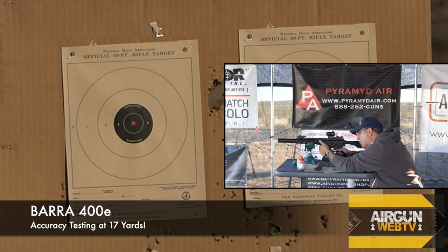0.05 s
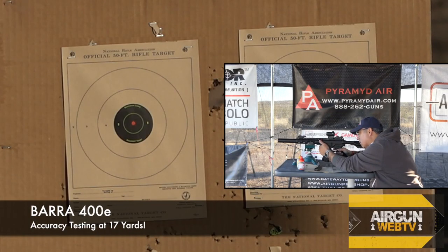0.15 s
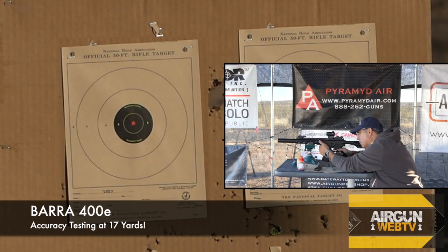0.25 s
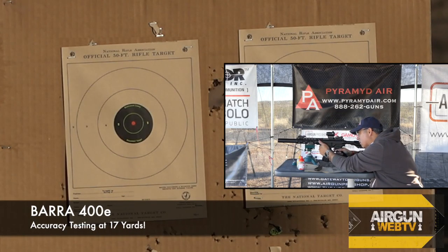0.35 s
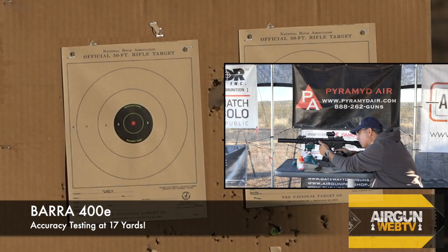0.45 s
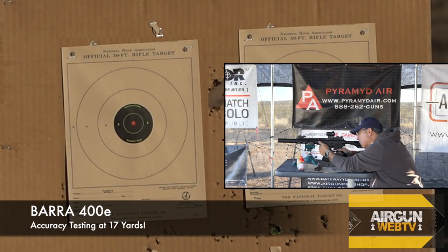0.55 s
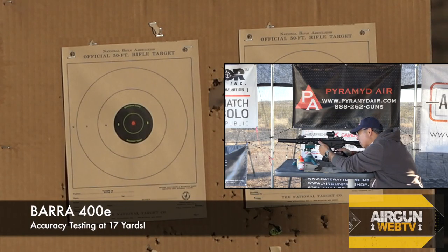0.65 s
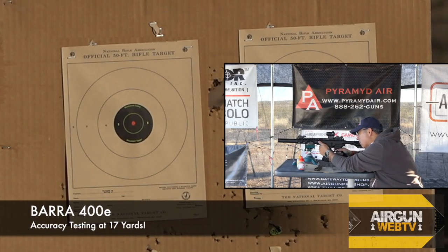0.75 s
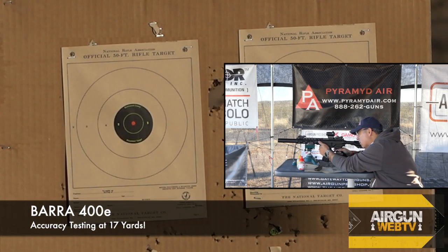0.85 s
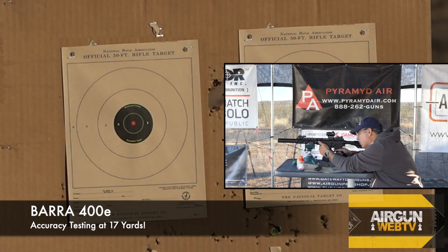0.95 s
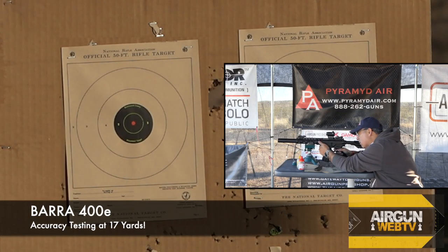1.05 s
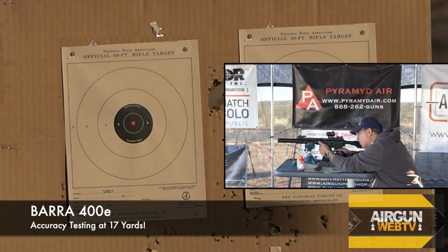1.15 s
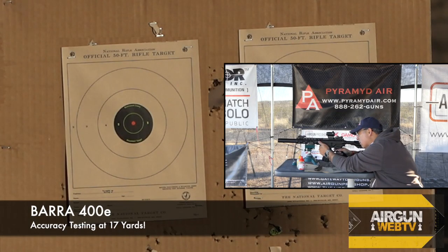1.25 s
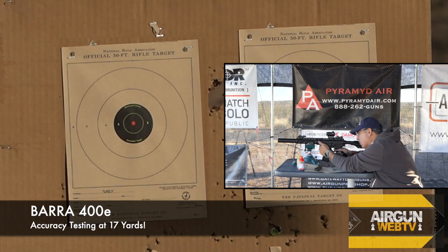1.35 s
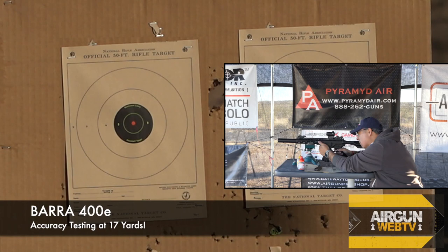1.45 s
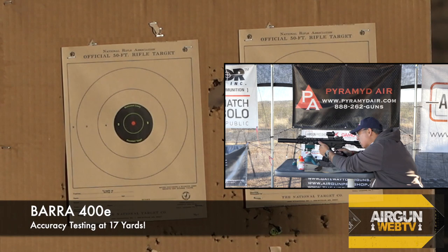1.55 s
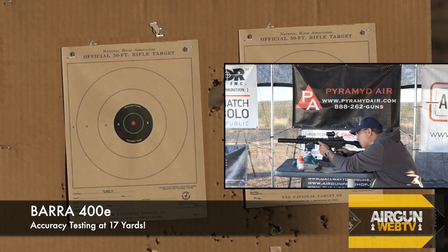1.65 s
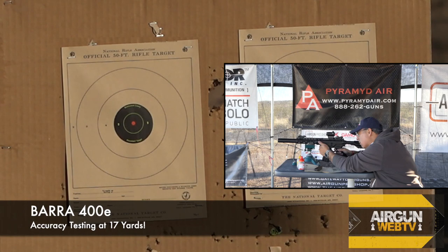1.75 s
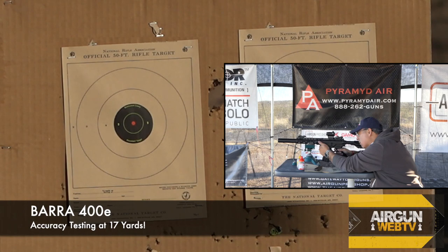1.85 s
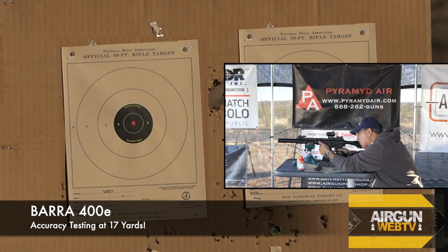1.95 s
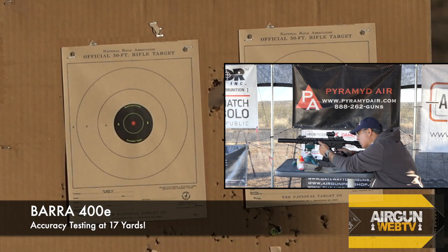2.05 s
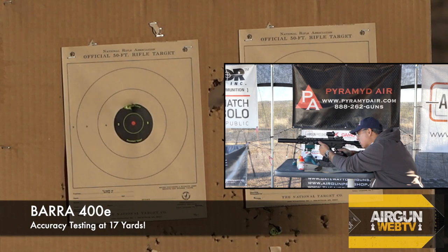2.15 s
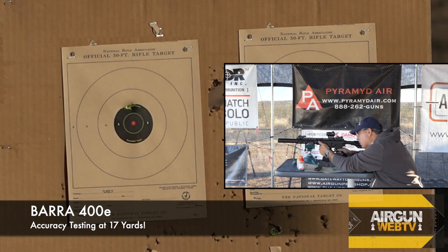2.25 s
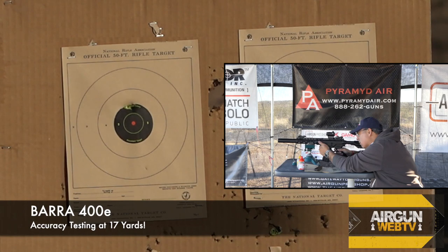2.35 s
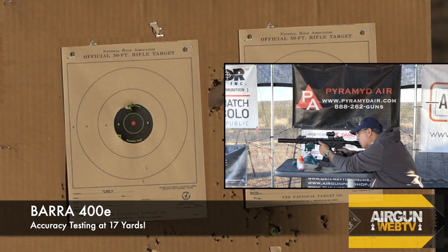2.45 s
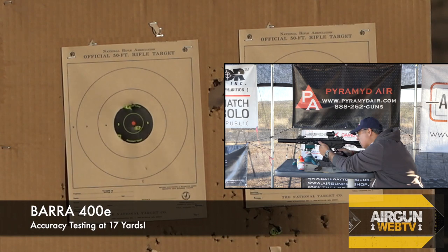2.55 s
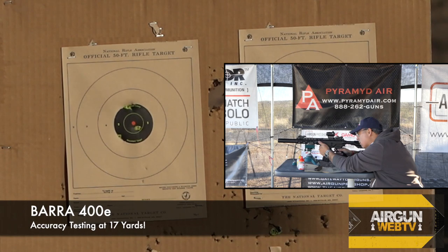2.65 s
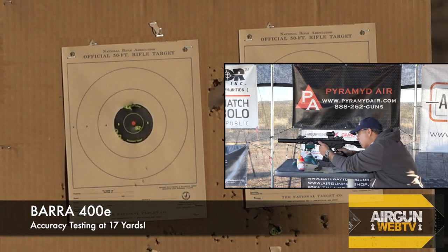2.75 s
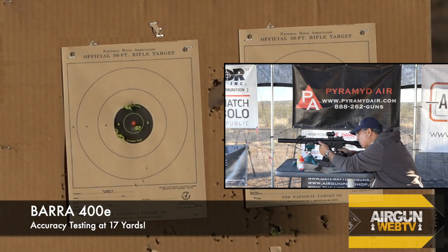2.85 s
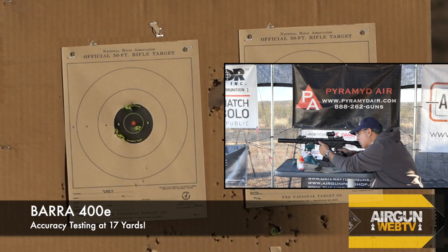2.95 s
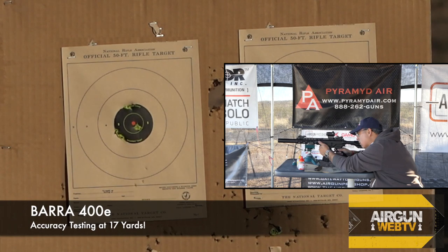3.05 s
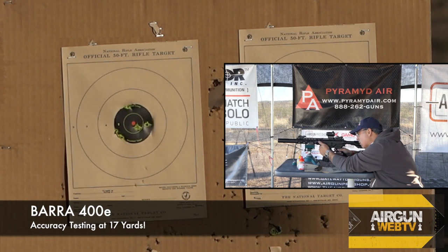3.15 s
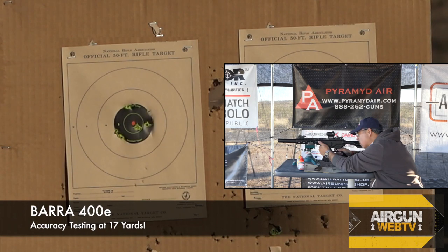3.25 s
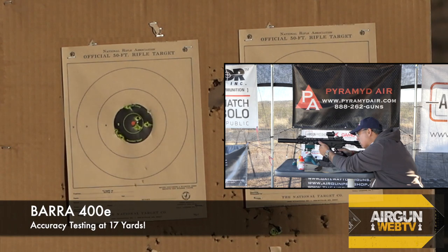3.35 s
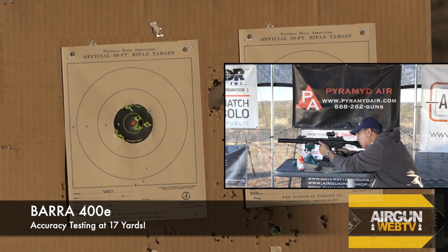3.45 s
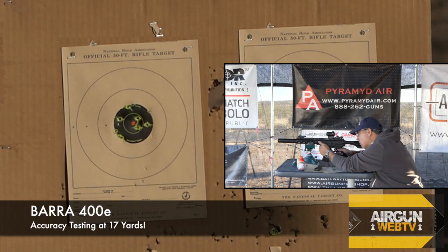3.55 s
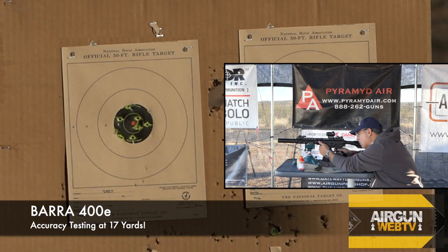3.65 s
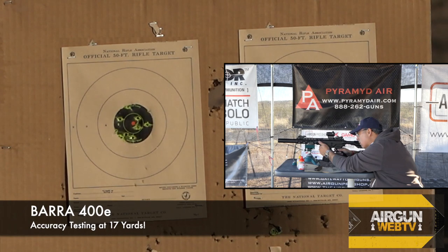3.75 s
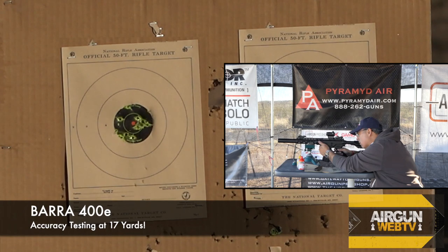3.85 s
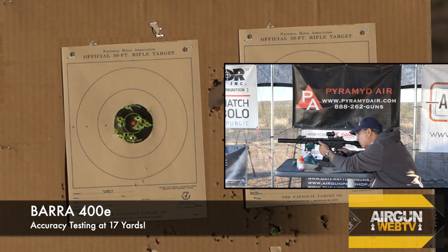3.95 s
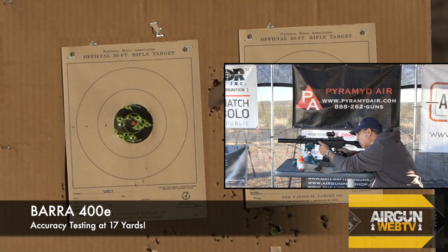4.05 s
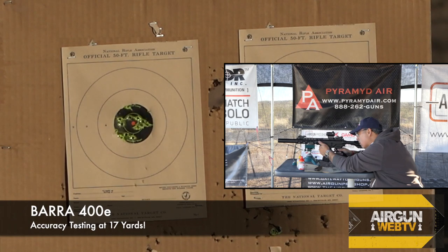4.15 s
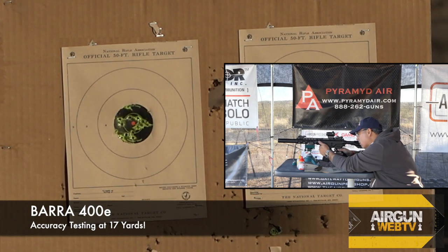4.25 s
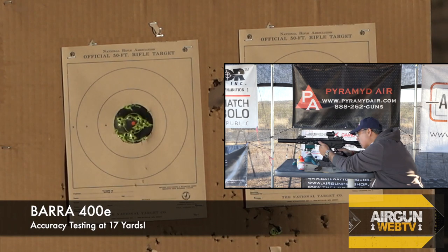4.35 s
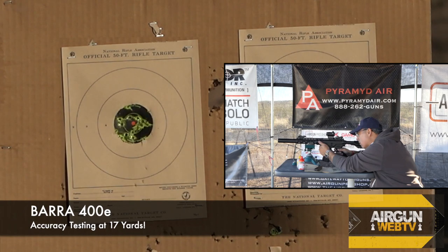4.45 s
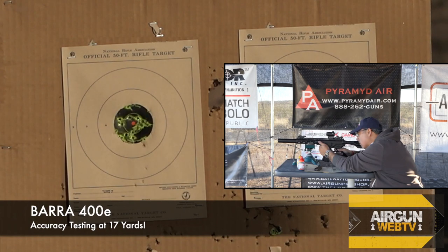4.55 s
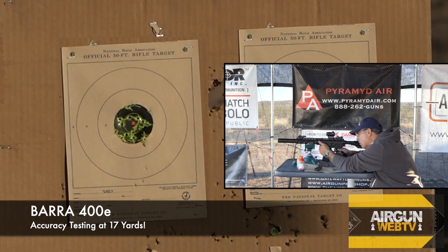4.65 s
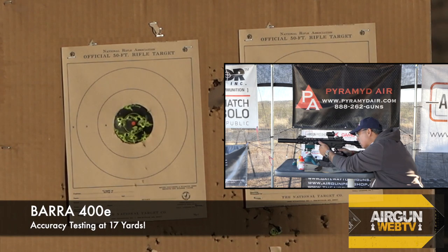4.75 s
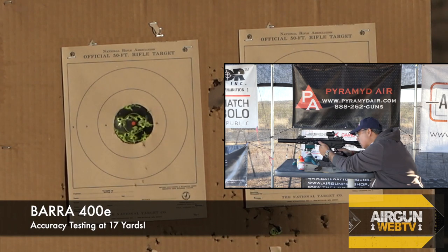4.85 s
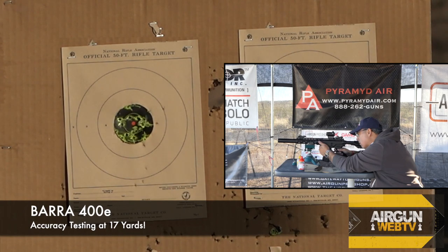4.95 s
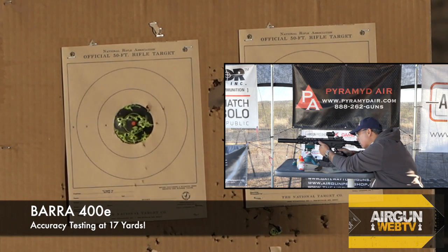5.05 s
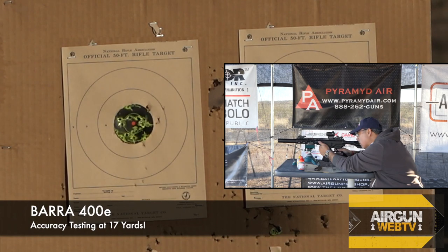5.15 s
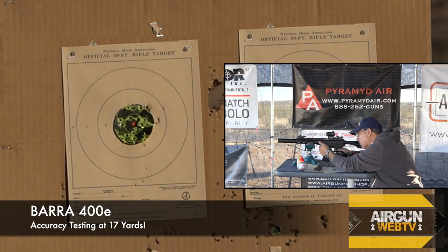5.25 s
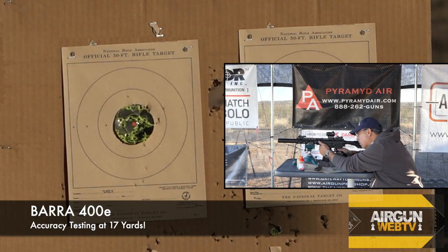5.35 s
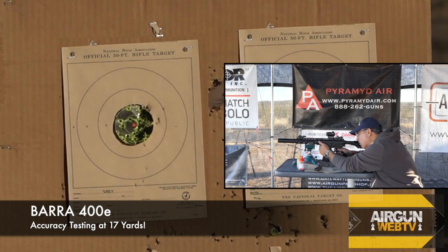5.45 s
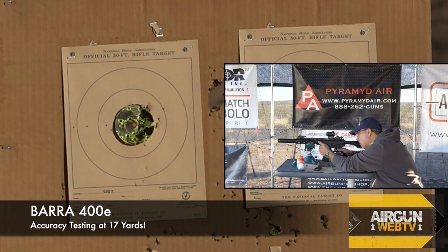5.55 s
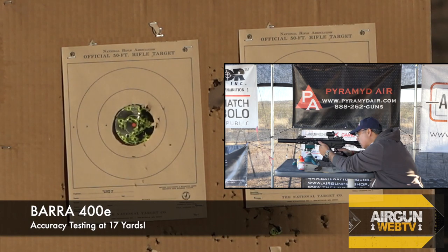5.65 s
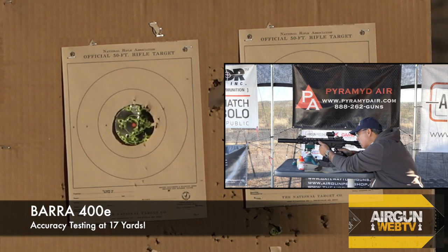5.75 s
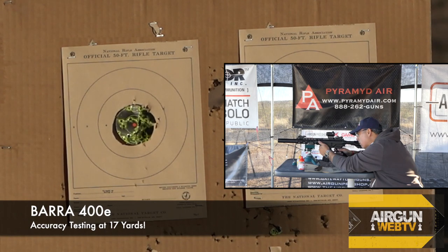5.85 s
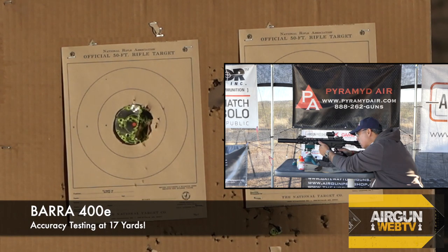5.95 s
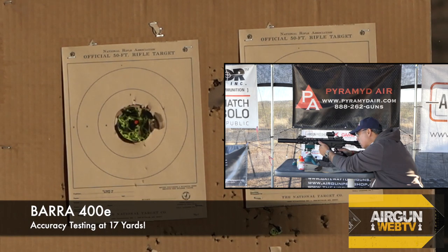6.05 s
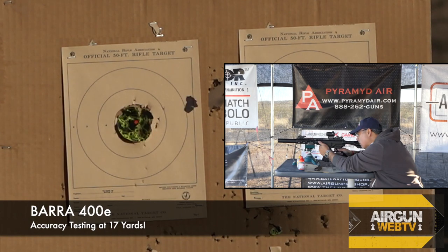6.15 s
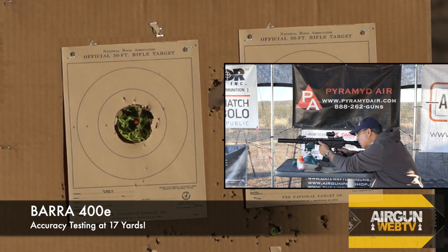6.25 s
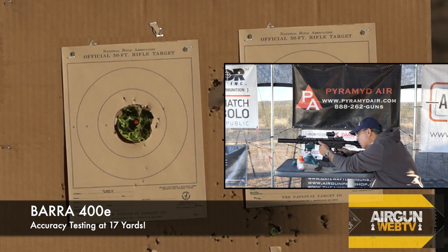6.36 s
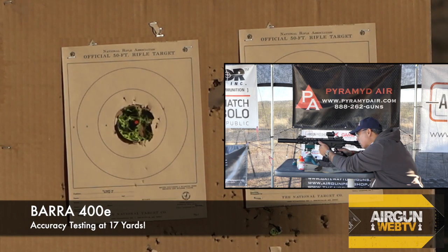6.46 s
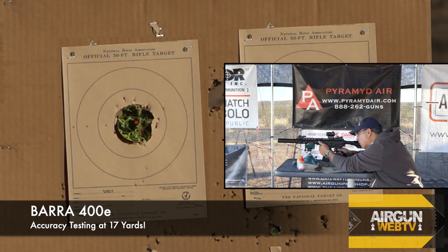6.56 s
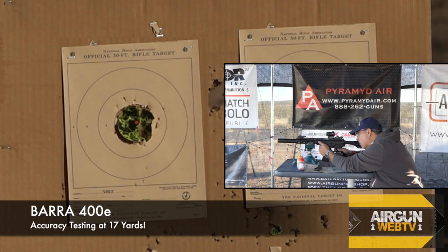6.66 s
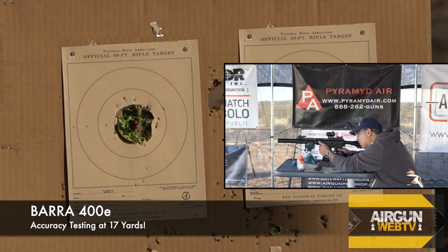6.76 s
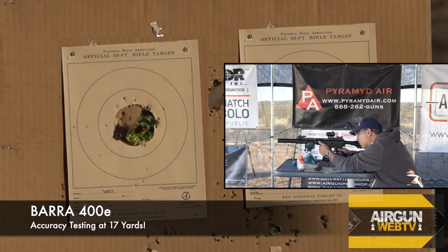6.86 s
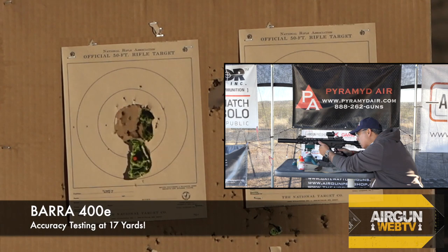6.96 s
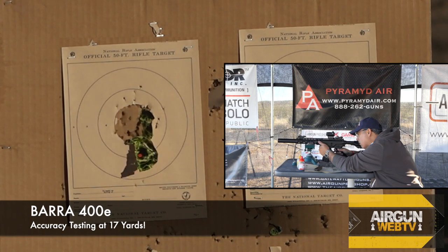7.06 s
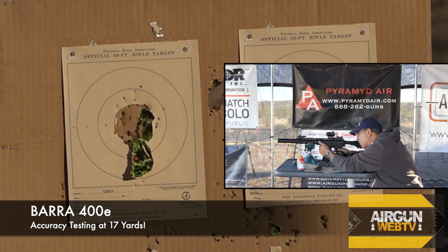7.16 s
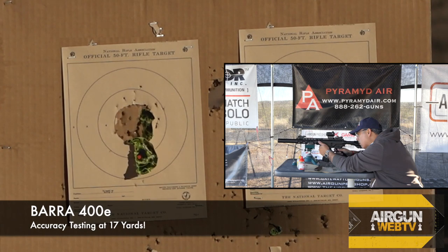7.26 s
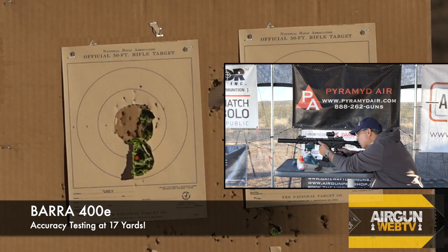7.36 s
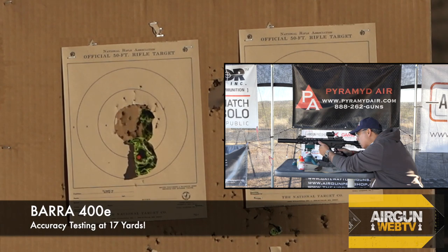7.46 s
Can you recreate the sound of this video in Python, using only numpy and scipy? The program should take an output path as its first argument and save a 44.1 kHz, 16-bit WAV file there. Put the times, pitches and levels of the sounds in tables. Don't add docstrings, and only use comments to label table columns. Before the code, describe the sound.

After quiet wind and a sleeve brush, a geared air gun fires continuously, rapid even clacking pops over motor whine, ending with hollower empty snaps.

```python
import sys
import numpy as np
from scipy import signal
from scipy.fft import rfft, irfft, next_fast_len
from scipy.io import wavfile
from scipy.ndimage import uniform_filter1d, map_coordinates

SR = 44100
rng = np.random.default_rng(int(sys.argv[2]) if len(sys.argv) > 2 else 0)


def transcribe(signal):
    frames = np.atleast_2d(signal).T
    limited = np.clip(frames, -1, 1)
    pcm = np.round(limited * 32767).astype(np.int16)
    wavfile.write(sys.argv[1], SR, pcm)


def boost_factor(decibels):
    exponent = np.asarray(decibels, float) / 20
    return 10 ** exponent


N = 331407

# time in seconds, pinion mesh in Hz, spring load in dB, grind in dB.
SPIN_UP = [
    (1.673, 900, -60, -45),
    (1.677, 1250, -14, -1),
    (1.681, 1500, -3, 7),
    (1.692, 1950, 0, 7),
    (1.703, 2380, 5.5, 4.5),
    (1.722, 2700, 5.5, 4),
    (1.736, 2660, 4, 3),
]
# time in seconds, sag of motor and air in dB, piston slam in dB.
EFFORT = [(1.75, 0, 3), (1.95, -0.5, -1), (2.45, 1, -4), (2.75, 0.5, -0.7), (4.35, 0.5, 1),
          (4.5, -1.3, -0.8), (5.85, -3, 2), (5.95, -4, 2.5), (6.3, -3.5, 2), (6.55, -4, 0.3),
          (7.51, -5, -1.5)]
BITE_S = SPIN_UP[2][0]


def unit(x):
    return x / np.sqrt(np.mean(x ** 2) + 1e-20)


def along(points, hz):
    f, v = np.transpose(points)
    return np.interp(np.log(hz + 1), np.log(f + 1), v)


def curves(rows):
    s, *cols = np.transpose(rows)
    return [np.interp(np.arange(N) / SR, s, c) for c in cols]


def wobble(rate):
    knots = rng.standard_normal(int(N * rate / SR) + 4)
    return map_coordinates(knots, [np.arange(N) * rate / SR])


def filtered(x, gain):
    m = next_fast_len(N + 8192)
    return irfft(rfft(x, m) * gain(np.fft.rfftfreq(m, 1 / SR)), m)[:N]


def coloured(x, spectrum):
    return filtered(x, lambda hz: boost_factor(along(spectrum, hz)))


def noise(spectrum):
    return unit(coloured(rng.standard_normal(N), spectrum))


def add(track, s, sound):
    part = track[round(s * SR):][:len(sound)]
    part += sound[:len(part)]


def ring(hz, db, t60, rise_ms, length=.05):
    t = np.arange(int(length * SR)) / SR
    rise = 1 - np.exp(-t / (abs(rise_ms) / 1000 + 1e-5))
    return boost_factor(db - 60 * t / t60) * np.sin(2 * np.pi * hz * t) * rise


def burst(db, t60, low_hz, high_hz):
    t = np.arange(int(2 * t60 * SR)) / SR
    band = signal.butter(2, [low_hz, min(high_hz, SR / 2.2)], "bandpass", fs=SR, output="sos")
    return boost_factor(db - 60 * t / t60) * unit(signal.sosfilt(band, rng.standard_normal(len(t))))


def surroundings():
    # frequency in Hz, level in dB per Hz.
    hiss_colour = [(180, -57), (300, -13), (485, -5.5), (697, -9), (733, -4), (1070, -8.5), (13700, -19.5),
                   (15600, -30)]
    rumble_colour = [(12, -21), (20, -1), (48, -6.5), (86, -22.5), (155, -17), (300, -27), (390, -61),
                     (660, -120)]
    cloth_colour = [(350, -17), (600, -2), (928, 0), (1710, -9), (2160, 0), (2620, -13), (3170, -9),
                    (5170, -14), (5850, -13), (10700, -10), (15600, -21)]
    # time in seconds, peak in dB, centre in Hz, t60 in seconds.
    handling_ticks = [
        (0.2884, -48, 2310, 0.012),
        (0.5372, -37, 2300, 0.02),
        (0.566, -40, 1500, 0.03),
        (0.739, -41.5, 1900, 0.02),
    ]
    # time in seconds, peak in dB, frequency in Hz.
    bench_bumps = [
        (0.07, -50, 160),
        (0.874, -61, 86.1),
    ]
    trigger_switch = (1.663, -42, 4300, .015)
    gust_s, gust_half_s, brush_s = .1, .06, .13

    t = np.arange(N) / SR
    gust = np.clip(1 - abs(t - gust_s) / gust_half_s, 0, 1)
    hiss_db = -71.5 + 2 * gust + wobble(13.6)
    rumble_db = -71 + 11 * gust + 2 * wobble(14.0)
    out = boost_factor(hiss_db) * noise(hiss_colour) + boost_factor(rumble_db) * noise(rumble_colour)
    brush_db = -63 - np.maximum(80 * (brush_s - t), 120 * (t - brush_s))
    out += boost_factor(brush_db + 2.3 * wobble(29)) * noise(cloth_colour)
    for s, db, hz, t60 in handling_ticks + [trigger_switch]:
        add(out, s, burst(db - 15, t60, 0.5 * hz, 1.26 * hz))
    for s, db, hz in bench_bumps:
        add(out, s, ring(hz, db + 6, 0.052, 3.3, length=.1))
    return out


def shot_times():
    # shot number, time in seconds.
    cadence = [
        (0, 1.7516),
        (17, 3.4543),
        (25, 4.2535),
        (32, 4.9538),
        (44, 6.1564),
        (54, 7.1617),
        (57, 7.4625),
    ]
    number, s = np.transpose(cadence)
    return np.interp(np.arange(number[-1] + 1), number, s)


def shell(hz):
    # frequency in Hz, level in dB per Hz.
    shell_colour = [(150, -47), (250, -19.5), (442, -20), (783, -3), (1050, -2), (1560, -15), (1800, -18),
                    (3020, -9.5), (4190, -12.5), (5620, -11), (6680, -13), (9290, -10), (11600, -18.5),
                    (14300, -17.5), (15600, -31)]
    # frequency in Hz, width in Hz, gain in dB.
    shell_peaks = [(808, 226, -7.5), (1980, 180, 0), (3620, 170, 2), (4400, 570, 3.5), (5710, 80, 4.5),
                   (8440, 200, -11), (9500, 470, 1), (10600, 140, 3), (13660, 890, 1.5)]
    peaks_db = sum(db / (1 + (2 * (hz - centre) / wide) ** 2) for centre, wide, db in shell_peaks)
    return boost_factor(along(shell_colour, hz) + peaks_db)


def gears():
    # time after the pop in ms, pinion mesh in Hz, spring load on the teeth in dB.
    cycle = [
        (-8, 2690, -4),
        (-5, 2760, -30),
        (8, 3120, -30),
        (24, 3380, -30),
        (28, 3350, -30),
        (31, 3320, -6),
        (56, 3150, -4),
        (73, 2915, 0),
        (83, 2777, -.5),
    ]
    # multiple of the shaft turn, gain in dB per dB of load.
    tooth_orders = [(3, .5), (4, .5), (5, .5), (8, 1), (12, 2), (15, 1), (19, 3), (20, 3), (21.5, -1.5),
                    (24, 3), (28, .7), (30, .4), (36, 2), (40, 2)]
    tooth_dbs = [-21, -9.5, -22, -11.5, -18, -13.5, -15, -9.5, -24, -12, -12.5, -18.5, -19, -20]
    pinion_orders = [16, 32, 48]
    pinion_dbs = [-16, -19, -19]
    free_grind_db, pinion_loss_db = -6.5, 3

    rows = list(SPIN_UP)
    for s in shot_times():
        rows += [(s + ms / 1000, hz, db, free_grind_db * (db < -12)) for ms, hz, db in cycle]
    mesh_hz, load_db, grind_db = curves(rows)
    loaded = load_db > -12
    turns = np.cumsum(mesh_hz * (1 + 0.00399 * wobble(60)) / 16) / SR

    def line(k, db):
        return boost_factor(db + 2.6 * wobble(200)) * np.sin(2 * np.pi * (k * turns + rng.uniform()))

    spin_db = np.maximum(load_db, 0)
    teeth = np.zeros(N)
    for (k, bite), db in zip(tooth_orders, tooth_dbs):
        spin_gain = 1.9 if k == 8 else .5
        teeth += line(k, db + spin_gain * spin_db + bite * load_db.clip(-6, 0))
    teeth *= uniform_filter1d(1. * loaded, size=90)
    motor = sum(line(round(k), db) for k, db in zip(pinion_orders, pinion_dbs))
    motor *= boost_factor(spin_db - pinion_loss_db * loaded)

    beat = boost_factor(3 * np.cos(2 * np.pi * turns) + 3 * np.cos(8 * np.pi * turns))
    grind = boost_factor(.7 * grind_db - 3 + 1.2 * wobble(150)) * beat * rng.standard_normal(N)
    grind = coloured(grind, [(550, -4), (820, 3), (1050, -8), (1800, -7), (2600, 0), (6000, 0),
                             (10000, -7), (14000, -3)])
    whirr_db = np.where(load_db < -40, grind_db, spin_db) - 4 + wobble(40)
    whirr = coloured(boost_factor(whirr_db) * rng.standard_normal(N),
                     [(2000, -12), (5000, -7), (9500, 0), (14000, -3)])
    running = np.arange(N) > SPIN_UP[0][0] * SR
    train = unit(filtered(running * (teeth + motor + grind + whirr), shell))
    return boost_factor(-26 + curves(EFFORT)[0]) * train


def bench():
    # frequency in Hz, level in dB per Hz.
    shake_colour = [(12, -37), (20, -28), (38, 10.5), (75, -8), (110, 4), (140, 3), (240, -120)]
    times = shot_times()
    rows = [(SPIN_UP[0][0], -60), (times[0] - .01, -6)]
    for s in times:
        rows += [(s, -1.5), (s + .07, -10)]
    sag_db = curves(EFFORT)[0]
    return boost_factor(curves(rows)[0] - 47.5 + 0.88 * sag_db + 2.7 * wobble(3.13)) * noise(shake_colour)


def strike(track, s, db, delay_ms, rise_ms, mode_dbs):
    # mode in Hz, t60 in seconds.
    body_modes = [(560, .022), (840, .017), (1230, .024), (2400, .01)]
    modes = [ring(hz, db + mode_db + rng.normal(0, 1), t60, rise_ms)
             for (hz, t60), mode_db in zip(body_modes, mode_dbs)]
    add(track, s + delay_ms / 1000, sum(modes))


def first_bite(track):
    bite_dbs = (-32, -9.5, -10.5, -32)
    strike(track, BITE_S, 0, 0, .5, bite_dbs)
    add(track, BITE_S, burst(-18, 0.2, 2000, 6100))


def release(track, s, pop_db):
    # level in dB of one receiver mode, at the release and at the knock as the air leaves.
    release_dbs = (-34.5, -17, -29, -29)
    knock_dbs = (-21, -23, -24, -26)
    strike(track, s, .5 * pop_db, -7.5, .6, release_dbs)
    strike(track, s, .3 * pop_db, 0, .15, knock_dbs)


def rattle(track, s, pop_db):
    add(track, s, burst(-34 + .5 * pop_db, .09, 900, 1600))


def pop(track, s, pop_db):
    # frequency in Hz, level in dB, t60 in seconds.
    push_modes = [(198, -15.5, 0.015), (133.7, -36.5, 0.26), (41, -36, 0.073)]
    push = sum(ring(hz, pop_db + db, t60, 1, length=.3) for hz, db, t60 in push_modes)
    add(track, s - .0027, -push)
    add(track, s - .0004, burst(pop_db - 32, .015, 2500, 12000))


def slam(track, slam_s, slam_db, crack_db):
    slam_dbs = (-41, -9, -20, -34)
    strike(track, slam_s, slam_db, -1.4, 1, slam_dbs)
    add(track, slam_s - .0015, burst(crack_db, .016, 1300, 8500))


def pick_up(track, s, pickup_db):
    pickup_dbs = (-22.5, -40, -27.5, -26)
    strike(track, s + rng.normal(0, 0.00044), pickup_db, 28.3, .8, pickup_dbs)
    add(track, s + .0278, burst(.5 * pickup_db - 27, .03, 2500, 12000))


def empty_slam(track, s, slam_s, slam_db, crack_db):
    empty_dbs = (-26, -19, -16, -26)
    # frequency in Hz, level in dB, t60 in seconds.
    hollow_modes = [(712, -13.5, 0.022), (1096, -20, 0.032)]
    strike(track, slam_s, slam_db, -1.1, .2, empty_dbs)
    add(track, slam_s - .0012, burst(crack_db + 1, .025, 900, 15000))
    add(track, slam_s - .0008, sum(ring(*mode, 0.53) for mode in hollow_modes))
    add(track, s, ring(32, -38, 0.15, 2.8, length=.3) + ring(348, -21, 0.021, 1.0, length=.3))


def strengths():
    s = shot_times()
    at, sag_db, slam_db = np.transpose(EFFORT)
    sag_db, slam_db = np.interp(s, at, sag_db), np.interp(s, at, slam_db)
    shot = np.arange(len(s))
    empty = shot >= 54
    misfed = np.isin(shot, [1, 2, 5])
    pop_db = np.where(empty, -7.5, 2 + 1.2 * sag_db)
    crack_db = np.where(empty | misfed, -20.5, -22.5)
    pickup_db = 3.7 + 1.3 * sag_db
    levels = np.transpose([pop_db, slam_db, crack_db, pickup_db])
    scatter_db = (.5, .6, 1.2, 1.9)
    levels = levels + scatter_db * rng.standard_normal(levels.shape)
    delay_ms = np.select([empty, misfed], [-.15, .35], 7.85 - .11 * sag_db)
    return zip(s, levels[:, 0], delay_ms, *levels[:, 1:].T)


def shots():
    out = np.zeros(N)
    first_bite(out)
    for s, pop_db, delay_ms, slam_db, crack_db, pickup_db in strengths():
        slam_s = s + delay_ms / 1000
        release(out, s, pop_db)
        rattle(out, s - .005, pop_db)
        pop(out, s, pop_db)
        slam(out, slam_s, slam_db, crack_db)
        rattle(out, slam_s, pop_db)
        if delay_ms < 0:
            empty_slam(out, s, slam_s, slam_db, crack_db)
        pick_up(out, s, pickup_db)
    return out


def scene():
    around = surroundings()
    gun = gears() + shots()
    echo = burst(-46, .05, 300, 9000)
    return (around + gun + signal.fftconvolve(gun, echo)[:N] + bench())[None]


def top_cut(x):
    return signal.sosfilt(signal.butter(12, 15750, fs=SR, output="sos"), x)


def record(dry):
    # frequency in Hz, gain in dB.
    mic_colour = [(230, 1), (300, -7), (400, -7), (480, -5), (560, 0), (15000, -1), (15550, -12),
                  (15750, -50)]
    return top_cut(coloured(dry[0], mic_colour)[None])


dry = scene()
out = record(dry)
transcribe(out)
```